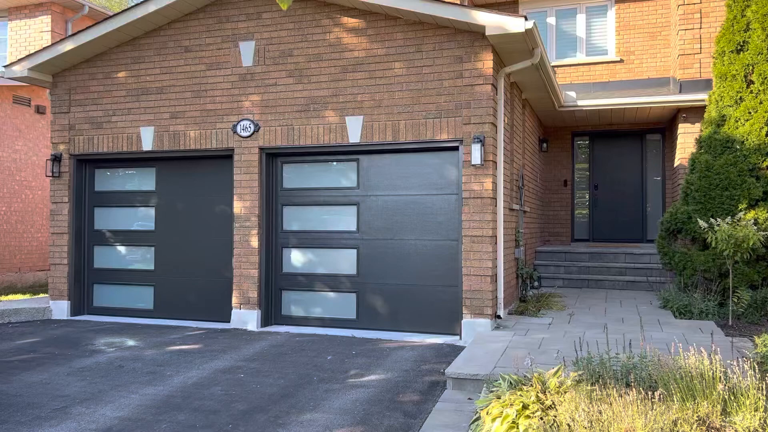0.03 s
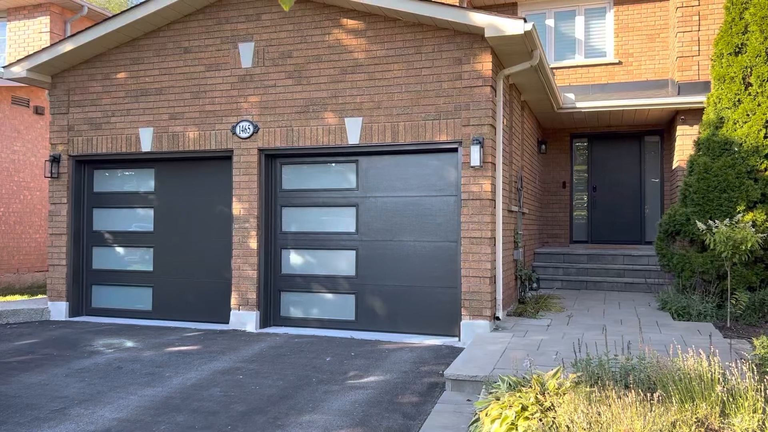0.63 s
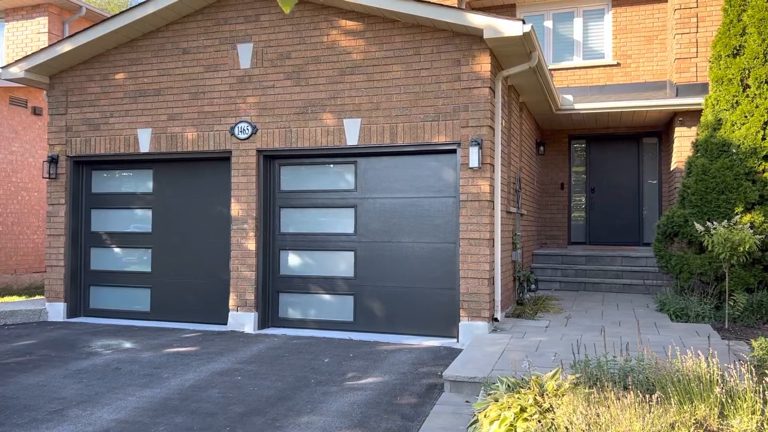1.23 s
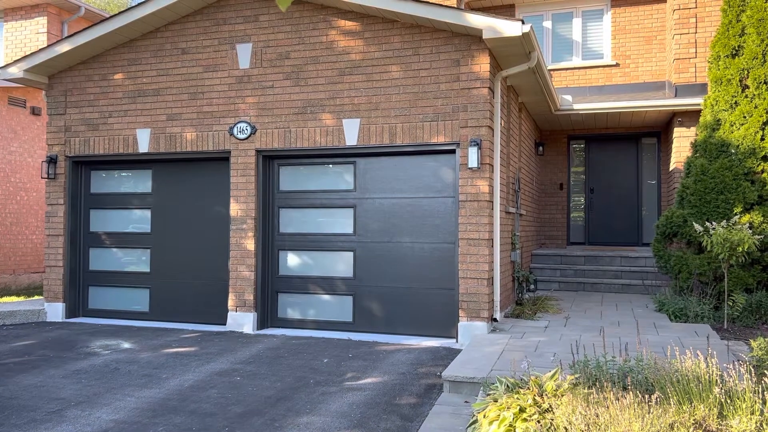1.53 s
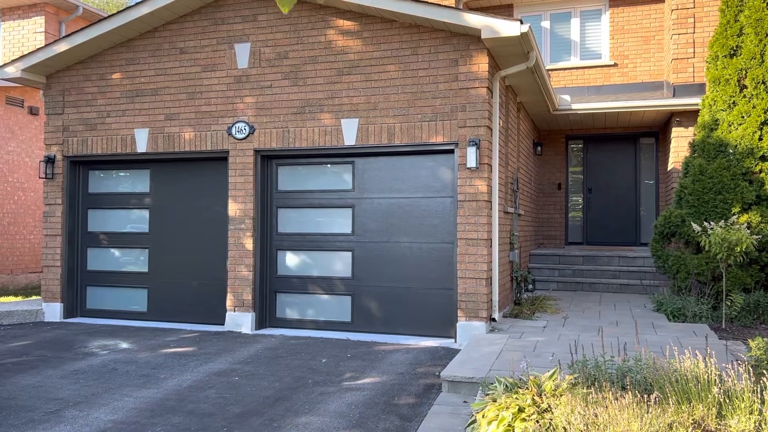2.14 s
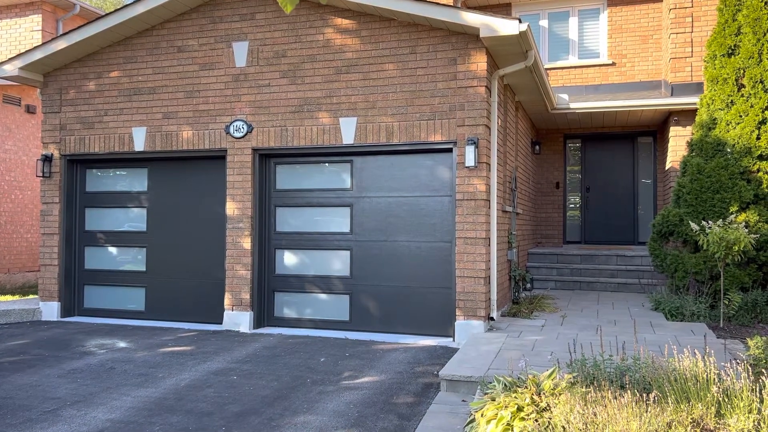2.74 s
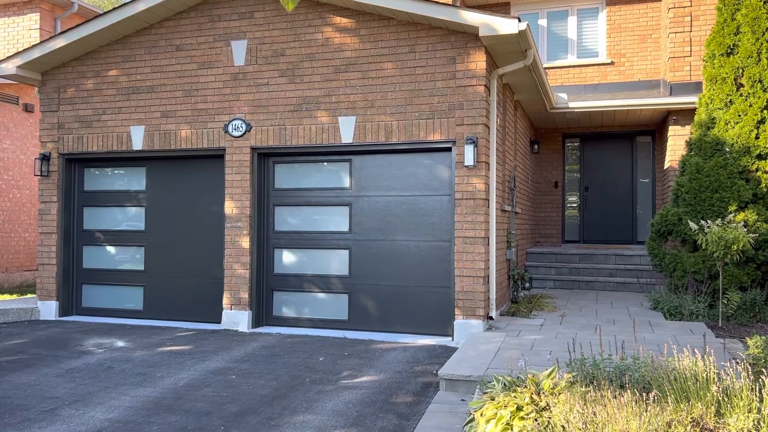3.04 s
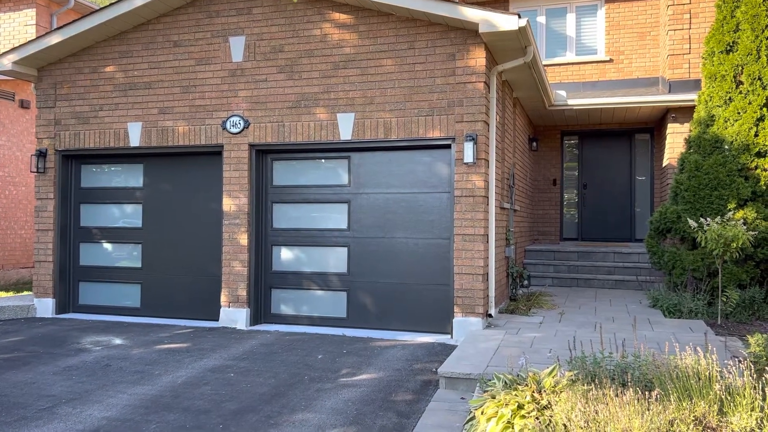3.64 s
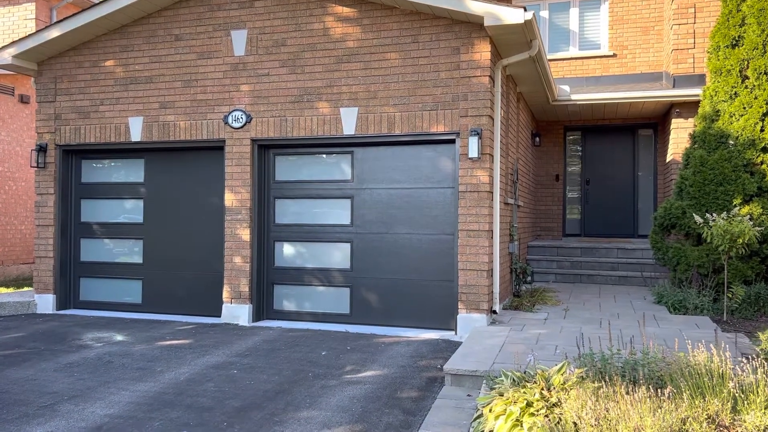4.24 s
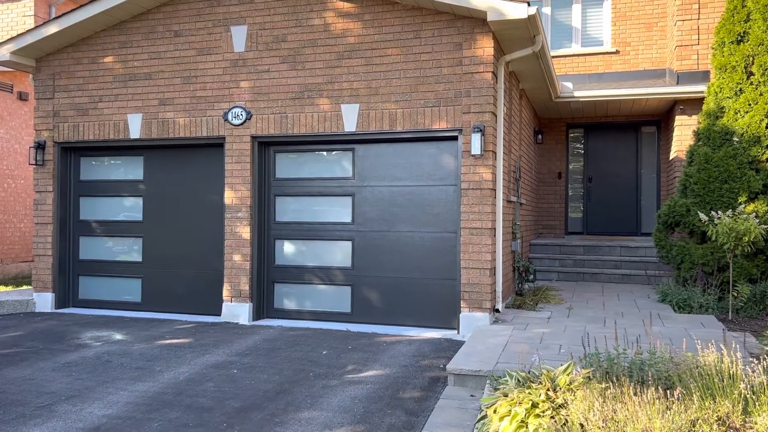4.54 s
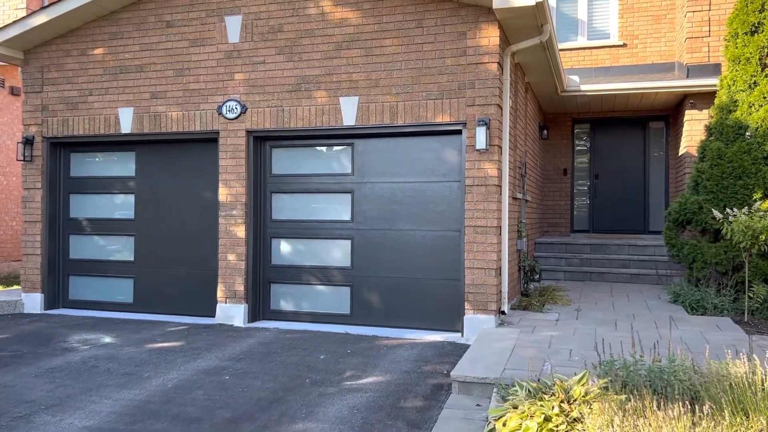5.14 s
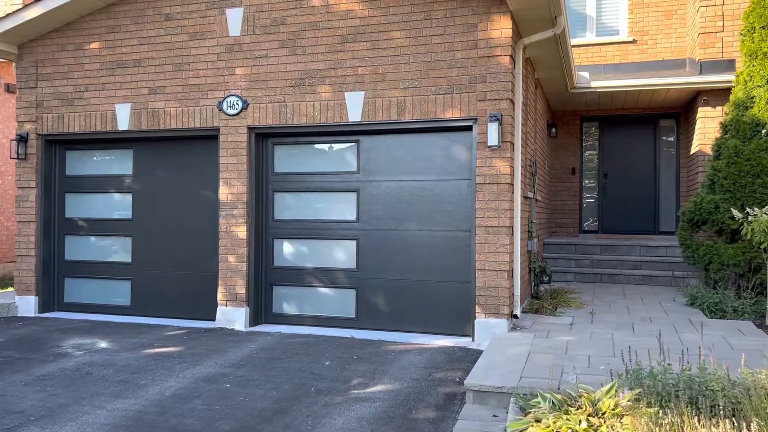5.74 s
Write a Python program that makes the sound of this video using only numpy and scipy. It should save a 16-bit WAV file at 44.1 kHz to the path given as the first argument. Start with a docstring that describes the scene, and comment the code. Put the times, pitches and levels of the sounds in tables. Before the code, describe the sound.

Low puffs of wind tumble over the microphone outside a house, growing into one brief gust. Throughout, small birds trade faint, high, trilled calls that echo slightly, while an insect scrapes steadily over a distant town wash and a weak hum. Toward the end, a light papery rustle swells twice, each time trailed by a thin hiss, with a few tiny dry clicks.

```python
"""Distant town noise and a faint machine hum hang over a quiet suburban driveway. Small birds trade
very high, trilled calls that echo off house fronts and trees, and an insect scrapes its wings in
buzzing pulses. A breeze tumbles over the microphone in low eddies and grows to a gust. Near the end
come a soft, papery rustle, a fine, high hiss that swells just after it, and a few dry ticks."""
import sys
import numpy as np
from scipy import signal
from scipy.fft import rfft, irfft
from scipy.io import wavfile

SR = 44100
rng = np.random.default_rng(int(sys.argv[2]) if len(sys.argv) > 2 else 0)


def log_audio(samples):
    """Write samples as a 16-bit WAV file to the path given in sys.argv[1]."""
    # one column per channel
    frames = np.atleast_2d(samples).T
    # limit to full scale, then quantise
    limited = np.clip(frames, -1, 1)
    pcm = np.round(limited * 32767).astype(np.int16)
    wavfile.write(sys.argv[1], SR, pcm)


N = 255780
T, FREQS = np.arange(N) / SR, np.arange(N // 2 + 1) * SR / N + 1e-3
LEFT_RIGHT = np.array([[.5], [-.5]])  # splits a difference evenly between the channels


def undb(db):
    """Decibels to gain."""
    return 10 ** (np.asarray(db) / 20)


def unit(x):
    """Scale to rms 1."""
    return x / np.sqrt(np.mean(x ** 2))


def curve(points):
    """Join (seconds, value) points into an envelope."""
    return np.interp(T, *np.transpose(points))


def over_hz(points):
    """Join (Hz, value) points on a log-frequency axis."""
    hz, value = np.transpose(points)
    return np.interp(np.log(FREQS), np.log(hz), value)


def colour(x, points):
    """Filter by (Hz, dB) points."""
    return irfft(rfft(x) * undb(over_hz(points)), N)


def bell_filter(x, hz, octaves):
    """Keep one bell-shaped band around hz."""
    return irfft(rfft(x) * np.exp(-.5 * (np.log2(FREQS / hz) / octaves) ** 2), N)


def band(hz, octaves):
    """Noise in one bell-shaped band, rms 1."""
    return unit(bell_filter(rng.standard_normal(N), hz, octaves))


def walk(rate_hz):
    """Smooth random wandering, rms 1."""
    return unit(irfft(rfft(rng.standard_normal(N)) * np.exp(-(FREQS / rate_hz) ** 2), N))


def stereo_noise(likeness):
    """White noise whose two channels agree as the (Hz, correlation) points say."""
    c = np.clip(over_hz(likeness), -1, 1)
    mid, side = rfft(rng.standard_normal((2, N))) * np.sqrt([(1 + c) / 2, (1 - c) / 2])
    return irfft(np.array([mid + side, mid - side]), N)


def arch(u):
    """A smooth swell while u runs from -1 to 1."""
    return np.where(np.abs(u) < 1, np.cos(np.pi / 2 * u) ** 2, 0)


def yard(x, t60, wet_db):
    """Add scattered stereo echoes from the house fronts and trees."""
    t = T[:SR]
    tails = rng.standard_normal((2, SR)) * undb(-60 * t / t60) * (t > .008)
    tails /= np.sqrt(np.sum(tails ** 2, axis=1, keepdims=True))
    return x + undb(wet_db) * signal.fftconvolve(x[None], tails, axes=1)[:, :N]


def town(flicker_db=1.29):
    """A diffuse bed of distant noise whose tyre roar swells slowly."""
    # Tone of the bed. Each row: frequency in Hz, noise density in dB.
    spectrum = [(24, -112), (50, -82.5), (110, -84.5), (200, -89.5), (450, -94.5), (880, -92.5),
                (1400, -99.3), (2500, -105), (5200, -111), (7000, -111), (8700, -110), (9600, -127),
                (11300, -118), (15500, -119)]
    # Its stereo width. Each row: frequency in Hz, left-right correlation.
    likeness = [(100, 0.67), (260, 0.75), (500, -0.2), (1000, -0.58), (1600, -0.31), (2500, 0.2),
                (6500, -0.14), (8800, 1), (10500, 1)]
    # Swell of the tyre roar. Each row: time in seconds, gain in dB.
    swell = [(0, -2), (.27, -1.5), (.43, 1.5), (.6, 0), (1.15, 1), (1.35, 3.5), (1.47, 2), (1.58, -3),
             (1.75, 4), (1.92, 1), (2.1, 0), (3.0, 0.3), (4.1, -0.4), (4.4, 1), (5.2, 2), (5.8, 1)]
    air = colour(stereo_noise(likeness), spectrum) * np.sqrt(SR / 2)
    tyres = bell_filter(air, hz=900, octaves=1.0)
    tyre_gain = undb(curve(swell) + flicker_db * walk(21))
    return air + tyres * (tyre_gain - 1)


def machine_hum(waver_db=3.5, drift_radians=0.28):
    """A faint machine drone: low partials, each wavering in level and phase."""
    # Each row: frequency in Hz, rms level in dB.
    partials = [(120, -68), (240, -79.5), (422, -84.5), (591, -87)]
    return sum(np.sqrt(2) * undb(db + waver_db * walk(0.42))
               * np.sin(2 * np.pi * hz * T + drift_radians * walk(0.9)) for hz, db in partials)


def far_twitter(db=-76, patchy_db=4):
    """The farthest birds blur into patches of thin high noise that come and go."""
    patches = sum(undb(patchy_db * walk(11)) * band(hz, octaves=0.031) for hz in (7750, 8100, 8400))
    return yard(undb(db) * unit(patches), t60=0.17, wet_db=-4.5)


def insect(stroke_s=0.12, wing_hz=8780):
    """A raspy wing resonance, scraped about three times a second."""
    # Wing strokes. Each row: centre in seconds, level in dB.
    strokes = [(.36, -71.5), (.71, -75), (.86, -76), (1.07, -73), (1.41, -69.5), (1.77, -75), (2.12, -73),
               (2.48, -74), (2.82, -75), (3.04, -75), (3.19, -75), (3.56, -76), (3.68, -71), (4.05, -71),
               (4.4, -72), (4.79, -72), (5.17, -72)]
    scrape = sum(undb(db) * arch(2 * (T - s) / stroke_s) ** .5 for s, db in strokes)
    return yard(scrape * band(wing_hz, octaves=0.04), t60=0.35, wet_db=-8.0)


def sing(notes, shape, trill_hz=116, waver_hz=70, scatter_hz=40.2, rasp=0.62, octave_db=-18):
    """Thin arched notes with a faint octave; a fast, uneven trill shakes their pitch and level."""
    out = np.zeros(N)
    length, hz, rise_hz, arch_hz, depth_hz, throb = shape
    trill = np.sin(2 * np.pi * np.cumsum(trill_hz * (1 + 0.0854 * walk(33.7))) / SR)
    pressure = (1 + throb * trill) * (1 + rasp * walk(690))
    waver = waver_hz * walk(400)
    for start, db in notes:
        on = (T > start) & (T < start + length)
        u = 2 * (T[on] - start) / length - 1
        contour = hz + scatter_hz * rng.standard_normal() + rise_hz * u / 2 - arch_hz * u ** 2
        phase = 2 * np.pi * np.cumsum(contour + depth_hz * trill[on] + waver[on]) / SR
        tone = np.sin(phase) + undb(octave_db) * np.sin(2 * phase)
        out[on] += undb(db) * arch(u) ** 0.036 * pressure[on] * tone
    return out


def birds(near_db=-1, middle_db=-1.5, far_db=-1, peep_db=-76.5):
    """One bird chips close by, fairly dry; the others call from farther off, blurred by the yard."""
    # The calls. Each row: start in seconds, relative level in dB.
    chips = [(.385, -63), (.69, -65.5), (.93, -63.5), (1.519, -63), (2.056, -60), (2.555, -61.5),
             (3.058, -60), (3.511, -61), (4.076, -61), (4.95, -63.5), (5.365, -73)]  # short and arched
    whistles = [(.33, -67.5), (.872, -68), (1.395, -67), (1.882, -65.5), (2.37, -68), (2.835, -67.5),
                (3.325, -69), (3.758, -70), (4.27, -67.5)]  # thin and level
    slurs = [(.595, -67), (1.135, -75)]  # quick and upward
    sighs = [(.44, -74.5), (1.38, -73), (1.89, -73), (2.37, -77), (2.86, -75), (3.38, -81), (3.91, -75),
             (4.41, -73), (4.88, -71), (5.33, -74.5)]  # soft and falling
    peeps = [(s, peep_db) for s in (1.59, 2.17, 2.671, 2.89, 3.25, 3.57, 3.86, 4.17, 4.47, 4.77)]
    # Each note shape: length in seconds; pitch, rise, arch and trill depth in Hz; throb from 0 to 1.
    chip_note = (.054, 7700, 30, 200, 50, .45)
    whistle_note = (.092, 7200, 74, 60, 45, .25)
    slur_note = (.036, 7100, 1150, 330, 190, .3)
    sigh_note = (.09, 6900, -180, 40, 170, .5)
    peep_note = (.07, 7580, 0, 20, 25, .3)
    near = yard(sing(chips, chip_note), t60=0.26, wet_db=-4.5)
    middle = yard(sing(whistles, whistle_note) + sing(slurs, slur_note), t60=.35, wet_db=-2)
    far = yard(sing(sighs, sigh_note) + sing(peeps, peep_note), t60=0.39, wet_db=2)
    return undb(near_db) * near + undb(middle_db) * middle + undb(far_db) * far


def swell_envelope(start, length, sag_db_per_s=0, attack_s=0.087, release_s=0.13):
    """One swell rises, holds or sags, then dies away."""
    t = T - start
    attack = np.clip(t / attack_s, 0, 1) ** 2
    sag = undb(-sag_db_per_s * np.maximum(t - attack_s, 0))
    return attack * sag * np.exp(-np.maximum(t - length, 0) / release_s)


def rustle_and_hiss(grain_db=0.5, surge_db=1.0, hiss_flicker_db=3, hiss_lag_s=0.033):
    """A soft, papery rustle; a fine, high hiss swells just after it."""
    # Tone of the two layers. Each row: frequency in Hz, gain in dB.
    rustle_eq = [(200, -15), (600, 3), (1000, 5.5), (1800, 3.5), (3000, -7), (4500, -27), (9000, -15)]
    hiss_eq = [(1500, -17), (3500, 3.5), (5200, 12), (7000, 10.5), (8600, 6), (9900, -7), (11300, 13),
               (13500, 3.5), (15300, 9.5)]
    # Stereo width. Each row: frequency in Hz, left-right correlation.
    likeness = [(250, 0.62), (700, 0.76), (2000, 0.99), (4000, 0.17), (6000, -0.3), (8800, 1), (10500, .99)]
    # Each row: start and length in seconds, rustle and hiss levels in dB.
    swells = [(4.297, 0.4, -75.5, -79), (4.511, 0.46, -60.5, -68.5), (5.379, 0.15, -62.5, -62),
              (5.556, 0.14, -69.5, -63.5), (5.634, .2, -58.5, -55.5)]
    grainy = stereo_noise(likeness) * undb(grain_db * walk(390) + surge_db * walk(32))
    rustle = unit(colour(grainy, rustle_eq))
    hiss = unit(colour(grainy * undb(hiss_flicker_db * walk(890)), hiss_eq))
    return sum(undb(rustle_db) * rustle * swell_envelope(start, length, sag_db_per_s=20.5)
               + undb(hiss_db) * hiss * swell_envelope(start + hiss_lag_s, length)
               for start, length, rustle_db, hiss_db in swells)


def ticks():
    """Tiny dry cracks that die quickly; they reach the left microphone port just after the right."""
    # Each row: start in seconds, level in dB, band centre in Hz, width in octaves, decay in seconds.
    cracks = [(1.189, -63, 13100, 0.28, .004), (1.655, -59, 2900, 0.36, 0.0094),
              (4.403, -55, 2290, 0.45, 0.0047), (4.404, -65, 5530, 0.35, 0.031),
              (4.453, -54.5, 2100, 0.75, 0.0073), (4.516, -60.5, 1300, 0.55, 0.016),
              (4.93, -66, 5100, 0.14, .006), (4.953, -53, 1660, 0.24, 0.0056),
              (4.954, -63, 4470, 0.36, 0.018), (5.014, -62, 1730, 0.64, 0.0095),
              (5.156, -60.5, 2300, 0.83, .005), (5.6, -57, 5270, 0.092, 0.0028),
              (5.764, -32, 11900, 0.23, 0.00062), (5.7644, -33, 6500, 0.32, 0.00076),
              (5.7642, -42, 3700, 0.25, 0.00044), (5.765, -34.5, 6600, 0.15, 0.0006),
              (5.7649, -41.5, 1190, 0.61, 0.0011)]
    bursts = sum(undb(db) * band(hz, octaves) * (T >= start) * np.exp(-np.abs(T - start) / decay)
                 for start, db, hz, octaves, decay in cracks)
    left, right = yard(bursts, t60=0.11, wet_db=-9.5)
    return np.array([np.roll(left, shift=1), right])


def wind(likeness=0.79, turbulence_db=2.5, eddy_swings=4.153, skew_radians=0.41, steepen=0.093):
    """Low buffeting, and eddies: short pressure swings that slow as they leave the microphone ports."""
    # Tone of the buffeting. Each row: frequency in Hz, gain in dB.
    buffet_eq = [(18, -42), (34, -3), (55, 3.5), (85, -1), (135, -5), (210, -21.5), (310, -32),
                 (400, -41.5), (900, -81)]
    # Strength of the breeze. Each row: time in seconds, level in dB.
    breeze = [(0, -86), (.6, -71.5), (1.08, -51), (1.3, -55), (1.55, -60.5), (1.8, -55), (2.0, -65),
              (2.2, -53.5), (2.4, -62.5), (2.8, -68), (2.98, -49), (3.4, -56), (3.57, -50.5), (3.7, -56),
              (3.97, -55), (4.08, -49), (4.55, -45), (4.72, -39.5), (4.765, -45), (4.81, -38), (4.9, -36),
              (5.02, -43), (5.17, -57), (5.32, -45), (5.48, -63.5), (5.8, -52)]
    # Strongest eddies. Each row: centre in seconds, pitch there in Hz, fall in octaves, level in dB.
    eddies = [(1.09, 71.5, 1.6, -41), (1.892, 83, 3.2, -42), (2.483, 93.4, 2.63, -29.5),
              (2.631, 65, 0.68, -44), (2.953, 63, 1, -43), (3.086, 58.4, 0.62, -42), (3.271, 76, 0.66, -45),
              (3.556, 70.6, 0.72, -56), (3.882, 61, 0.85, -46), (4.124, 58.7, 0.14, -31),
              (4.22, 71, 2.1, -30), (4.269, 60.7, 1.73, -22), (4.402, 88, 1.1, -35),
              (4.617, 60, 0.44, -38.5), (4.645, 127, 0.88, -38.5), (4.719, 165.4, 1.3, -31),
              (4.811, 56, 0.2, -32.5), (4.845, 115, 0.4, -36.5), (4.873, 140, 0.74, -32),
              (4.903, 61, 0.76, -30), (4.95, 54, 0.38, -34), (4.972, 185, 1.65, -31.5),
              (5.018, 162, 2.3, -39), (5.599, 74, 0.98, -41.5)]
    buffet = unit(colour(stereo_noise([(100, likeness)]), buffet_eq))
    out = buffet * undb(curve(breeze) + turbulence_db * walk(15))
    for centre, hz, fall, db in eddies:
        length = eddy_swings / hz
        on = np.abs(T - centre) < length / 2
        u = (T[on] - centre) / (length / 2)
        phase = 2 * np.pi * (np.cumsum(hz * 2 ** (-fall * u / 2)) / SR + rng.random())
        # each port meets the eddy at a slightly different moment
        phase = phase + skew_radians * LEFT_RIGHT
        # the leading side of an eddy is steeper than a sine
        swing = np.sin(phase) + steepen * (1 - u) / 2 * fall * np.sin(2 * phase)
        out[:, on] += undb(db) * arch(u) ** 0.82 * swing
    return out


def scene():
    """Everything heard from the driveway."""
    return town() + machine_hum() + wind() + birds() + far_twitter() + insect() + rustle_and_hiss() + ticks()


def record(dry):
    """The microphone ports tip the treble to the right; up high the two channels carry one sound slightly apart
    in time; a steep top cut."""
    # Balance of the ports. Each row: frequency in Hz, left minus right in dB.
    balance = [(300, -0.9), (900, -0.2), (1700, -2.5), (2600, 0), (4000, -3.5), (5300, -5), (6600, -7.5),
               (7700, -4), (8700, 0), (11000, 0)]
    lag_from_hz, lag_s = 7000, .0002
    silent_until_s, top_hz = .072, 15800
    tilt = undb(over_hz(balance) * LEFT_RIGHT)
    lag = np.exp(2j * np.pi * np.maximum(FREQS - lag_from_hz, 0) * lag_s * LEFT_RIGHT)
    sound = irfft(rfft(dry) * tilt * lag, N) * (T > silent_until_s)
    return signal.sosfilt(signal.ellip(10, .2, 80, top_hz, fs=SR, output="sos"), sound)


dry = scene()
out = record(dry)
log_audio(out)
```